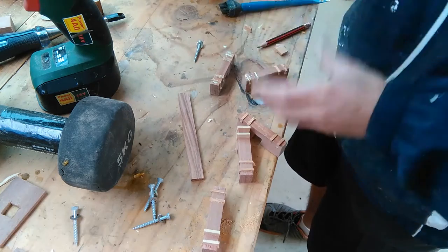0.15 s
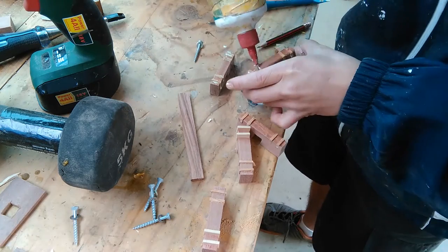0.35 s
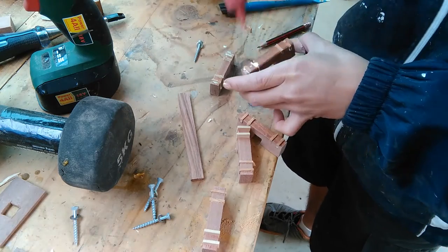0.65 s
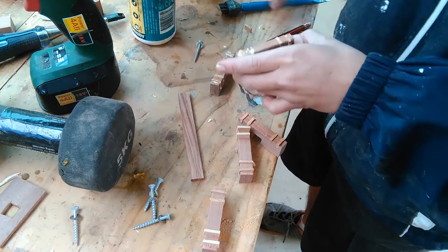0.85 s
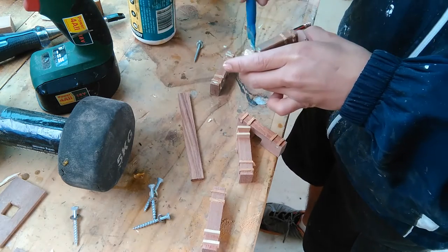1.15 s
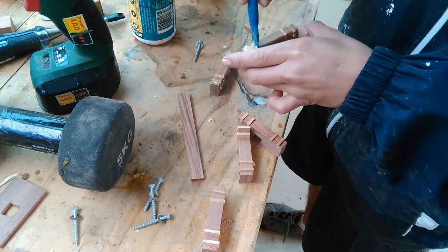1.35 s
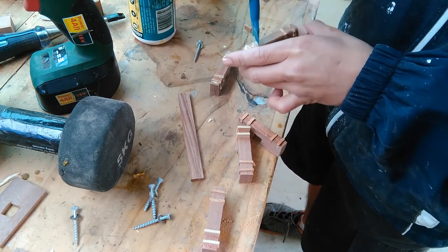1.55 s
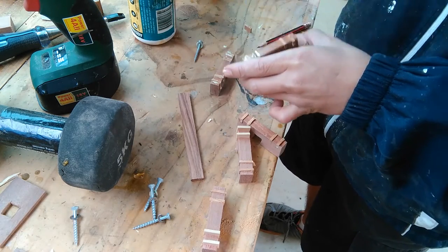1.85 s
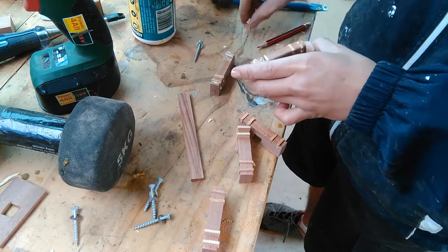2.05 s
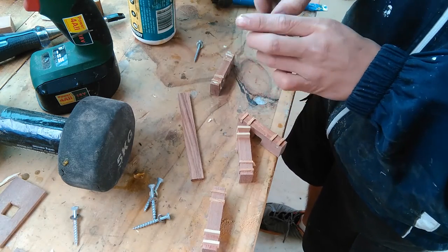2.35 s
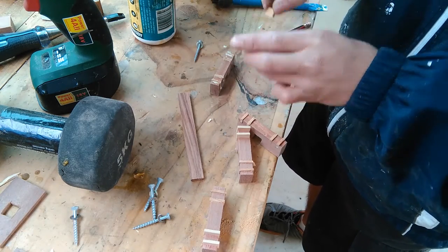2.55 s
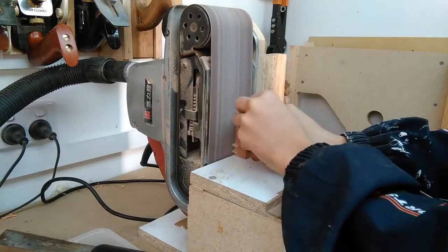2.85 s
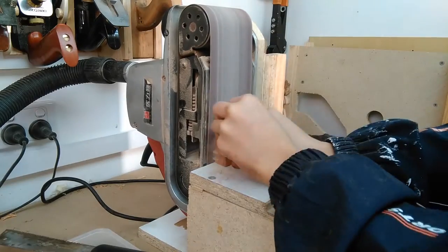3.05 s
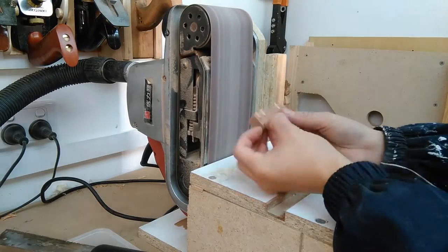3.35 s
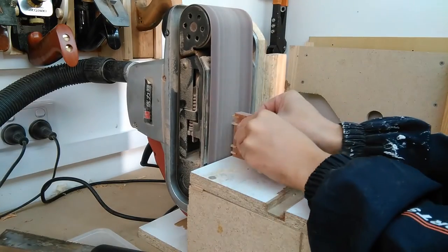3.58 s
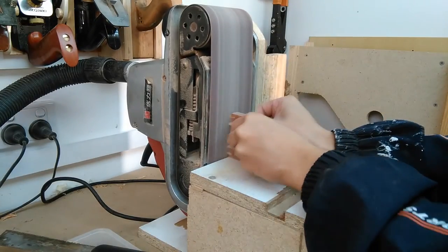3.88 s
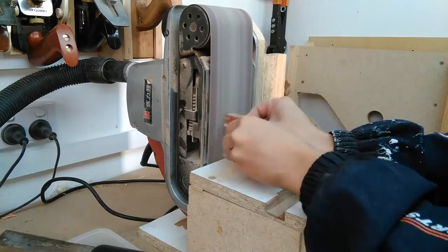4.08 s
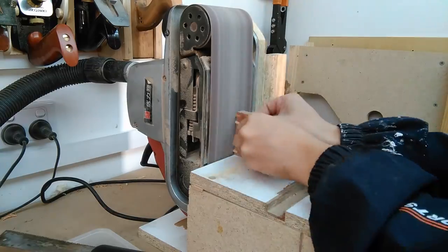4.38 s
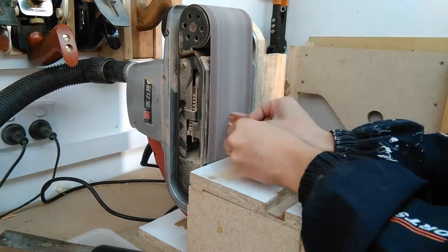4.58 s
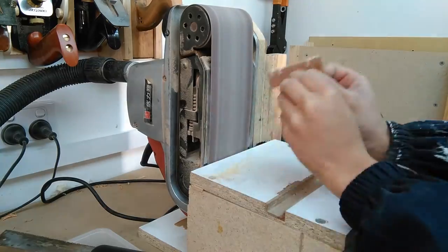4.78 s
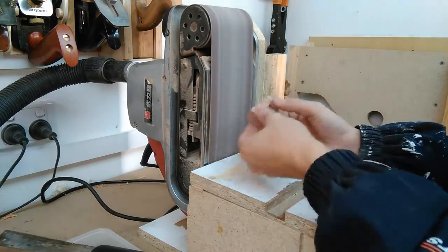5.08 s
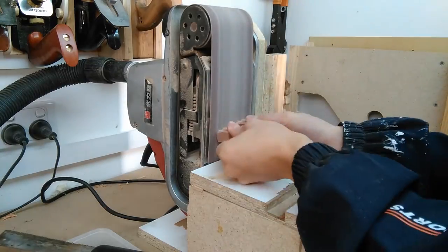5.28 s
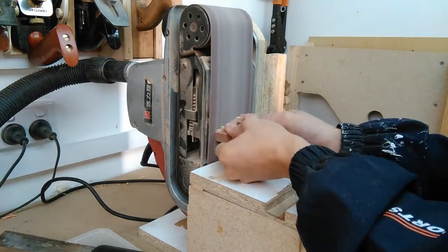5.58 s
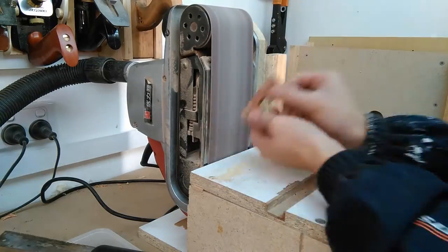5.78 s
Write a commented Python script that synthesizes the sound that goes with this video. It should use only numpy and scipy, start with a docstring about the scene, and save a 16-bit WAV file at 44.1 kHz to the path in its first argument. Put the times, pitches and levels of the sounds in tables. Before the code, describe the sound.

First a nearly quiet workbench: small wooden parts click and knock sharply, one drags briefly, and room murmur flickers with tiny dropouts. Then, with no run-up, a belt sander and dust extractor fill the close, indoor microphone with whine, airy hiss and fluttering roar. Repeated short bites of wood make the rasp swell and the motor pitch dip slightly, then recover. Identical in both channels.

```python
"""A belt sander and its dust extractor run after a hard cut from a quiet workbench, where a low hum fades.
The sander's gear teeth, fan blades and commutator whine in step with one sagging motor speed; its belt roars,
hisses and rasps (shaped noise). The extractor whistles steadily. Before the cut small wooden parts click, knock
and scrape (ringing modes and bursts of noise) and the faint room sound stutters. Both channels are the same."""
import sys
import numpy as np
from scipy import signal
from scipy.fft import rfft, irfft
from scipy.io import wavfile
from scipy.ndimage import uniform_filter1d

SR = 44100
rng = np.random.default_rng(int(sys.argv[2]) if len(sys.argv) > 2 else 0)


def to_wav(s):
    """Save 16-bit WAV."""
    ch = np.atleast_2d(s).T  # columns
    pcm = np.round(np.clip(ch, -1, 1) * 32767)  # PCM
    wavfile.write(sys.argv[1], SR, pcm.astype(np.int16))


N = 261513  # length in samples
TIME = np.arange(N) / SR  # seconds

CUT_S = 2.733  # the sander scene begins
SHAFT = .4411  # shaft turns per gear tooth
TEETH = 28  # teeth per turn of the belt roller

# The sander's changing speed and loudness: t/s, tooth rate/Hz, tooth tone rms level/dB, top treble level/dB
MOTOR_COURSE = [(2.73, 1406, -47, -36), (2.88, 1450, -41, -40), (2.98, 1416, -37, -37),
                (3.04, 1391, -43, -41), (3.13, 1391, -51, -36), (3.2, 1433, -38.5, -35),
                (3.3, 1462, -38, -35.5), (3.46, 1476, -39.5, -36.5), (3.6, 1478, -41.5, -37),
                (3.69, 1445, -37, -39), (3.8, 1423, -35.5, -46), (4.0, 1410, -41, -45),
                (4.17, 1409, -38, -44), (4.26, 1453, -39.5, -41), (4.4, 1478, -40, -43),
                (4.5, 1434, -43, -47), (4.62, 1401, -37, -44), (4.7, 1434, -46.5, -41),
                (4.86, 1476, -43.5, -43), (4.97, 1469, -44, -46), (5.22, 1488, -50.5, -43),
                (5.38, 1461, -44, -48), (5.62, 1420, -42, -46), (5.72, 1468, -40.5, -40),
                (5.85, 1479, -48, -48), (5.93, 1480, -49, -48)]


def speed():
    """Tooth rate in Hz; the rotor's inertia rounds off every change of speed."""
    inertia_s = .05
    return uniform_filter1d(curves(MOTOR_COURSE)[0], size=round(inertia_s * SR))


def motor():
    """Tooth, blade and commutator tones, all tied to one sagging speed; high minor tones smear more."""
    # The housing favours each whine at certain speeds: tooth rate/Hz, then rms level/dB of
    # twice the tooth tone, shaft order 10, the fan blades and the commutator bars
    whine_levels = [(1409, -43.5, -44, -40, -50), (1413, -38.5, -55, -64, -47),
                    (1445, -38.5, -58, -57, -57), (1446, -40.5, -45, -50.5, -54),
                    (1476, -50, -44, -41.5, -43), (1479, -38.5, -52, -44, -40)]
    # Companions of the tooth tone: multiples of its rate [no unit]
    minor_multiples = [.127, .17, .441, .881, 1.123, 1.322, 1.439, 1.764, 3, 4, 4.855, 5.17, 5.416, 6,
                       10.15]
    # The same companions: rms level at full speed/dB, gain per 1% sag under load/dB
    minor_levels = [(-65.5, -2.1), (-62, -4), (-60.5, -1.24), (-59.5, 2), (-50.5, -0.57), (-55, 0.7),
                    (-55.5, 1.54), (-46, -1.5), (-50.5, 0.47), (-55, 1), (-63, 0.5), (-44.5, -2), (-61, 1),
                    (-54.5, -2), (-51, -1.5)]
    free_hz = 1485  # tooth rate without load
    near_tenth = 4.428  # near the tenth shaft order, as a multiple of the tooth rate
    waver_db, waver_per_s = 2.5, 9  # these four whines waver by chance

    hz, tooth_db = speed(), curves(MOTOR_COURSE)[1]
    shaft_hz = SHAFT * hz
    sag_percent = 100 * (1 - hz / free_hz)
    blade_hz, bar_hz = 12 * shaft_hz, 24 * shaft_hz
    speeds, *levels = np.transpose(whine_levels)
    second_db, tenth_db, blade_db, bar_db = [
        np.interp(hz, speeds, db) + waver_db * wander(waver_per_s) for db in levels]

    out = gain_of(tooth_db) * tone(hz, 0.055, 38)
    out += gain_of(second_db) * tone(2 * hz, 0.059, 50)
    out += gain_of(tenth_db) * tone(near_tenth * hz, .2, 60)
    out += gain_of(blade_db) * tone(blade_hz, 0.3, 70)
    out += gain_of(bar_db) * tone(bar_hz, .7, 220)
    for multiple, (db, slope_db) in zip(minor_multiples, minor_levels):
        out += gain_of(db + slope_db * sag_percent) * tone(multiple * hz, 0.67, 14 + 24 * multiple)
    return out


def belt():
    """Broad roar and hiss; the rasp near 2 kHz and part of the roar puff at every turn of the roller."""
    # Wood bites into the belt and the rasp swells: start t/s, length/s, rasp level before wavering/dB
    bites = [(2.75, 0.34, -45.5), (3.585, 0.304, -42), (3.9, .25, -38.5), (4.381, .28, -41),
             (4.909, .14, -40.5), (5.225, 0.095, -45), (5.499, 0.063, -43.5), (5.68, 0.095, -43.5)]
    # Colour of the roar and hiss: f/Hz, relative level/dB per Hz
    roar_colour = [(12, -65), (20, -24), (126, -23), (171, -28.5), (395, -16.5), (508, -17.5), (691, -6.5),
                   (863, -6.5), (1350, -9), (1690, -11.5), (2790, 2.5), (3890, -6.5), (11600, -5),
                   (12600, -6), (15700, -6)]
    # Housing resonances: f/Hz, width/Hz, rms level at a 7 dB swell/dB, share of the rasp's swells followed
    housing = [(254.3, 16, -68.5, -0.27), (314, 31, -69, -0.29), (459, 25, -67.5, -0.56),
               (637.5, 47, -59, -0.5), (703.6, 27, -52, -0.36), (1080, 54, -55, -0.0019),
               (1640, 47, -65, 0.7), (2546, 47, -46, 0.5), (2766, 85, -51.5, -0.29), (4607, 100, -48, 0.52),
               (6010, 410, -47.5, 1), (7090, 190, -51, -0.22), (10060, 370, -45.5, 1),
               (11200, 570, -58.5, -0.22)]
    bite_edge_s = 0.026
    idle_rasp_db, body_db, hiss_db = -47.5, -38.5, -41.5
    body_share, hiss_share = 0.09, -0.24  # share of the rasp's swells that the roar and the hiss follow
    surge_db, surges_per_s = 0.9, 14  # the roar surges as the grit catches

    hz, top_db = speed(), curves(MOTOR_COURSE)[2]
    swell_db = np.zeros(N)
    for start, length, db in bites:
        nearest_edge = np.minimum(TIME - start, start + length - TIME)
        swell_db += (db - idle_rasp_db) * np.clip(nearest_edge / bite_edge_s + .5, 0, 1)

    turns = np.cumsum(hz) / SR / TEETH
    puffs = np.exp(-(turns % 1) / .1)
    # The roller knocks once a turn, unevenly
    taps = np.diff(np.floor(turns), prepend=0) * gain_of(4.7 * rng.standard_normal(N))
    drive = (0.53 + puffs) * rng.standard_normal(N) + 8 * taps
    rasp = gain_of(idle_rasp_db + swell_db + 1.14 * wander(12)) * resonate(drive, 1952, 410)

    body, air = split(noise(roar_colour, 3100, 7000, 2.3), 7800)
    shaft_turns = SHAFT * TEETH * turns
    hiss, top = split(air * (1 + .25 * np.cos(2 * np.pi * shaft_turns)), 11900)  # beats with the shaft
    roar_db = body_db + body_share * swell_db + surge_db * wander(surges_per_s)

    out = rasp + gain_of(roar_db) * body * (0.72 + 0.87 * puffs)
    for f, width, db, share in housing:
        out += gain_of(db + share * (swell_db - 7)) * resonate(rng.standard_normal(N), f, width)
    out += gain_of(hiss_db + hiss_share * swell_db) * evened(hiss)
    return out + gain_of(top_db) * evened(top)


def extractor():
    """Constant-speed whistles of the dust extractor."""
    # Steady tones: f/Hz, rms level/dB
    whistles = [(188, -71.5), (401, -68), (1702, -54), (11918, -45.5)]
    return sum(gain_of(db) * tone(hz, .08, 20) for hz, db in whistles)


def knocks():
    """Each knock rings the wood's modes and sends a crack of noise that dies away on the bench."""
    # The blows: t/s, approximate peak level/dB, crack minus ring/dB, treble tilt/dB per octave,
    # where the ring is strongest f/Hz, its fall-off/dB per octave
    blows = [(.035, -46, -12, -6, 900, 8), (.083, -11, 12.5, 1.5, 4640, 6.5), (.285, -44.5, -11, 3, 800, 1),
             (.781, -14, -0.5, -6.5, 2780, 0), (.873, -49, -14, -9, 1500, 12), (.904, -37, -8, -12, 900, 7),
             (0.92, -43, -14, -12, 1900, 18), (0.953, -41, -9, -12, 1600, 21),
             (0.994, -45, -14, -12, 1750, 13), (1.005, -45, -18, -12, 1500, 22),
             (1.063, -49, -14, -8, 850, 15), (1.152, -53, 6, -3, 5400, 22), (1.966, -44, -15, -7, 890, 9),
             (1.994, -26, 19, -6, 5200, 6), (2.015, -27.5, 6, -9, 1100, 2), (2.092, -54, -1, -8, 600, 5),
             (2.263, -53.5, 0, -7, 2910, 19), (2.69, -43, 2, -8, 3000, 3)]
    # Ringing modes of the wood: f before a small chance shift/Hz, relative level/dB, time to fall 60 dB/s
    wood_modes = [(584, -3.5, .04), (880, 1, 0.041), (1388, -1, 0.042), (1720, -2.5, 0.034),
                  (2120, -8, 0.064), (2300, 1.5, 0.014), (2815, -7.5, 0.044), (2895, -6.5, 0.044),
                  (3200, -15, 0.075), (3290, -16, 0.05), (3445, -16, 0.044), (3640, -9.5, 0.019),
                  (4520, -15.5, 0.026), (5480, -12.5, 0.015)]
    crack_t60_s = 0.085  # the crack's slow part falls 60 dB in this time
    crack_peak_db, crack_peak_octaves = 7.5, .4  # the crack is strongest where the ring is

    out, t, hz = np.zeros(N), np.arange(8192) / SR, np.fft.rfftfreq(8192, 1 / SR)
    for start, peak_db, crack_db, tilt_db, spot_hz, fall_db in blows:
        ring = np.zeros(len(t))
        for f, db, fade in wood_modes:
            shift, phase = rng.random(2)
            mode_db = db - fall_db * abs(np.log2(f / spot_hz)) - 60 * t / fade
            ring += gain_of(mode_db) * np.sin(2 * np.pi * (f * (.99 + 0.03 * shift) * t + 0.26 * phase))
        ring = ring * np.clip(t / .0008, 0, 1)  # the blow takes a moment
        # Near reflections off the bench break up the ring
        reflections = rng.standard_normal(600) * (rng.random(600) < .03) * .22 * np.exp(-t[:600] / .007)
        ring = np.convolve(ring, np.append(1, reflections))[:len(t)]

        peak = np.exp(-(np.log2(hz / spot_hz + 1e-9) / crack_peak_octaves) ** 2)
        colour = gain_of(tilt_db * np.log2(hz / 3000 + 0.51) + crack_peak_db * peak)
        colour = colour * hz ** 2 / (hz ** 2 + 800 ** 2)  # less bass
        crack = evened(irfft(rfft(rng.standard_normal(8192)) * colour))
        decay = gain_of(-60 * t / crack_t60_s) + 0.75 * np.exp(-t / 0.0036)
        crack = crack * decay / 4 * np.clip(t / 0.00072, 0, 1) ** 2

        mix = (ring / abs(ring).max() + gain_of(crack_db) * crack) / (1 + gain_of(crack_db))
        part = out[round(start * SR):][:len(t)]
        part += gain_of(peak_db) * mix
    return out


def scrape():
    """Wood dragged over the bench: uneven small slips ring the dragged piece."""
    # Loudness of the drag: t/s, rms level/dB
    drag_levels = [(0.85, -85), (0.876, -59), (0.894, -79), (0.908, -43.5), (0.932, -57), (1.064, -58.5),
                   (1.11, -89)]
    # Modes of the piece: f/Hz, width before the hand damps it/Hz, level before weighting by width/dB
    piece_modes = [(910, 56, 4), (1240, 98, 4), (1555, 35, 0.5), (1690, 94, 0), (2060, 79, -7),
                   (2340, 38, -18)]
    strengths = gain_of(3.5 * np.minimum(rng.exponential(1, N), 3))
    slips = rng.standard_normal(N) * (.15 + (rng.random(N) < 900 / SR) * strengths)  # about 900 a second
    ring = np.zeros(N)
    for f, width, db in piece_modes:
        ring += gain_of(db) * np.sqrt(width) * resonate(slips, f, 4 * width)  # the hand damps the ring
    inside = (TIME > drag_levels[0][0]) & (TIME < drag_levels[-1][0])
    return gain_of(curves(drag_levels)[0]) * inside * ring / np.std(ring[inside])


def hum():
    """A low hum swells, climbs a little in pitch, sags and fades."""
    start_hz, end_hz, glide_s = 329, 352, .5  # the pitch climbs, then holds
    start_db, peak_db, peak_s, sag_db_per_s = -49, -38, 0.15, 11.5
    release_s, fade_db_per_s = 0.46, 67  # the fade adds to the sag
    hz = start_hz + (end_hz - start_hz) * np.minimum(TIME / glide_s, 1)
    db = start_db + (peak_db - start_db) * np.minimum(TIME / peak_s, 1)
    db = db - sag_db_per_s * np.maximum(TIME - peak_s, 0)
    db = db - fade_db_per_s * np.maximum(TIME - release_s, 0)
    return gain_of(db) * tone(hz, 0.047, 70)


def bench():
    """The hum, room murmur and rustle (shaped noise), with short dips."""
    # Loudness before the lumps and dips: t/s, murmur level/dB, rustle level/dB
    room_levels = [(0, -61, -70.5), (.06, -46, -60), (.18, -49.5, -63), (.48, -49.5, -72),
                   (.62, -57.5, -70.5), (.95, -60, -68.5), (1.2, -60, -73), (1.42, -57.5, -68.5),
                   (1.65, -54.5, -67), (2.05, -59.5, -66.5), (2.07, -71, -87), (2.24, -75, -79),
                   (2.265, -57.5, -71), (2.36, -63.5, -73.5), (2.46, -60, -71), (2.73, -57.5, -63.5)]
    # Colour of the murmur: f/Hz, relative level/dB per Hz
    murmur_colour = [(12, -58), (20, -18), (33, -31.5), (117, -18.5), (260, -7), (306, -18.5), (347, -3),
                     (387, -13.5), (555, -5), (990, -20), (1500, -37), (1950, -59), (3300, -120)]
    # Room resonances in the murmur: f/Hz, width/Hz, relative level/dB
    room_modes = [(260.3, 46, -9), (344, 14, -7), (424, 31, -9), (574.3, 29, -10), (869, 36, -21)]
    # Colour of the rustle: f/Hz, relative level/dB per Hz
    rustle_colour = [(590, -32), (1000, 0.5), (2430, -5.5), (2950, -5.5), (3720, -9.5), (4680, -7),
                     (5900, -15), (15700, -18.5)]
    # The sound dips briefly: t/s, depth/dB, half length/s
    dips = [(0.699, 12, 0.0071), (0.853, 11, 0.0054), (1.116, 14, 0.006), (1.144, 13, 0.0027),
            (1.206, 22, 0.011), (1.26, 8, 0.0058), (1.308, 18, 0.01), (1.381, 31, 0.0032),
            (1.438, 18, 0.0055), (1.522, 10, .007), (1.671, 7.5, 0.0091), (1.956, 11, 0.013),
            (2.083, 18, 0.0075), (2.161, 20, 0.021), (2.235, 23, 0.0047), (2.286, 23, 0.0089),
            (2.331, 19, .005), (2.397, 21, .008), (2.475, 18, 0.0041), (2.724, 14, 0.0095)]
    lump_db, lumps_per_s = 2, 25  # the murmur comes in lumps
    dip_return = 0.55  # the sound comes back in this share of the half length

    murmur_db, rustle_db = curves(room_levels)
    murmur = gain_of(-4.0) * noise(murmur_colour, 400, 1000, 2.5)
    for f, width, db in room_modes:
        murmur += gain_of(db) * resonate(rng.standard_normal(N), f, width)
    lumps_db = lump_db * wander(lumps_per_s)
    room = gain_of(murmur_db + lumps_db) * murmur
    room += gain_of(rustle_db + 0.63 * lumps_db) * noise(rustle_colour, 1300, 6000, 1.8)

    dip_db = np.zeros(N)
    for middle, depth_db, half in dips:
        side = half * np.where(TIME > middle, dip_return, 2 - dip_return)
        dip_db += depth_db * np.exp(-((TIME - middle) / side) ** 2)
    return (hum() + room) / gain_of(dip_db)


def rumble():
    """Faint building rumble: low noise, 6 dB stronger at first, easing off before 0.9 s."""
    # Colour of the rumble: f/Hz, relative level/dB per Hz
    rumble_colour = [(10, -7), (30, 6), (90, 1.5), (150, -6.5), (260, -28)]
    db = -82 + 6 * np.clip((.9 - TIME) / 0.18, 0, 1)
    return gain_of(db) * noise(rumble_colour, 20, 150, 1.5)


def gain_of(db):
    """Decibels to gain."""
    return 10 ** (np.asarray(db) / 20)


def evened(x):
    """Scales to rms 1."""
    return x / np.sqrt(np.mean(x ** 2) + 1e-20)


def curves(rows):
    """Draws each table column after the time as a line, one value per sample."""
    s, *columns = np.transpose(rows)
    return [np.interp(TIME, s, c) for c in columns]


def wander(per_s):
    """Slow chance movement, up to per_s turns a second, from 16 sines; about rms 1."""
    t = np.arange(0, N + 256, 256) / SR
    rates = np.geomspace(per_s / 8, per_s, num=16)
    slow = sum(np.sin(2 * np.pi * (f * t + rng.random())) / np.sqrt(f) for f in rates)
    return np.interp(TIME, t, evened(slow))


def noise(points, lo_hz, hi_hz, patchy_db):
    """Noise of a given spectrum with drifting patches; rms 1 between lo and hi."""
    hz = np.fft.rfftfreq(1024, 1 / SR)
    a, b, patches = rng.standard_normal((N // 256 + 5, 513, 3)).T
    patches = evened(uniform_filter1d(uniform_filter1d(patches, 12, 0), 12, 1))  # over pitch, then time
    f, db = np.transpose(points)
    colour_db = np.interp(np.log(hz + 1), np.log(f), db)[:, None]
    z = (a + 1j * b) * gain_of(colour_db + patchy_db * patches)
    band = ((hz > lo_hz) & (hz < hi_hz))[:, None]
    sound, part = signal.istft(np.array([z, z * band]), nperseg=1024, noverlap=768)[1][:, :N]
    return sound / np.std(part)


def resonate(x, hz, width):
    """Shifts the curve hz down to zero, smooths twice, shifts back: a steep resonance, rms 1."""
    turn = np.exp(2j * np.pi * np.cumsum(hz * np.ones(N)) / SR)
    r = np.exp(-np.pi * width / SR)
    smooth = signal.lfilter([1], np.poly([r, r]), x / turn)
    return evened((turn * smooth).real)


def tone(hz, rough, width):
    """A sine along the curve hz, blended with a narrow band of noise around it."""
    clean = np.sqrt(2) * np.sin(2 * np.pi * (np.cumsum(hz * np.ones(N)) / SR + rng.random()))
    rough = np.clip(rough, 0, 1)
    return np.sqrt(1 - rough) * clean + np.sqrt(rough) * resonate(rng.standard_normal(N), hz, width)


def split(x, hz):
    """The parts below and above hz."""
    low = signal.sosfiltfilt(signal.butter(N=4, Wn=hz, fs=SR, output="sos"), x)
    return low, x - low


def scene():
    """The bench first, then the cut to the sander; a faint rumble lies under both."""
    running = np.clip((TIME - CUT_S) / 0.0013, 0, 1)
    sander = motor() + belt() + extractor()
    workbench = knocks() + scrape() + bench()
    mono = running * sander + (1 - running) * workbench
    mono = split(mono, 140)[1] + rumble()  # the rumble takes the place of the deep bass
    return np.array([mono, mono])


def record(dry):
    """A steep low-pass filter limits the treble."""
    edge_hz = 15740
    low_pass = signal.firwin(1023, edge_hz, window=("kaiser", 9), fs=SR)
    return signal.oaconvolve(dry, low_pass[None], "same")


dry = scene()
out = record(dry)
to_wav(out)
```